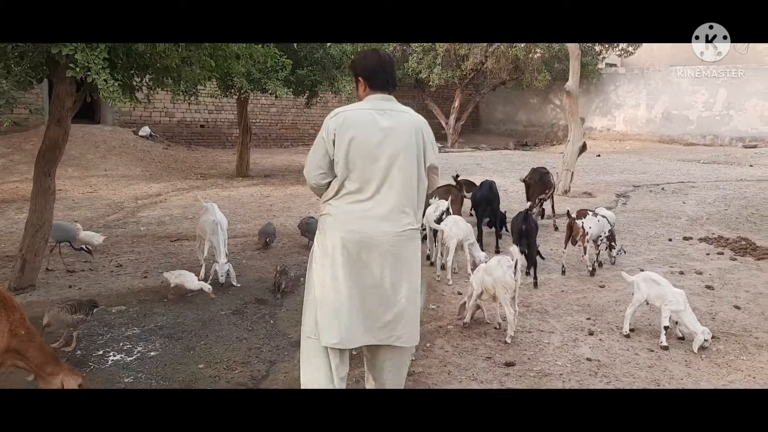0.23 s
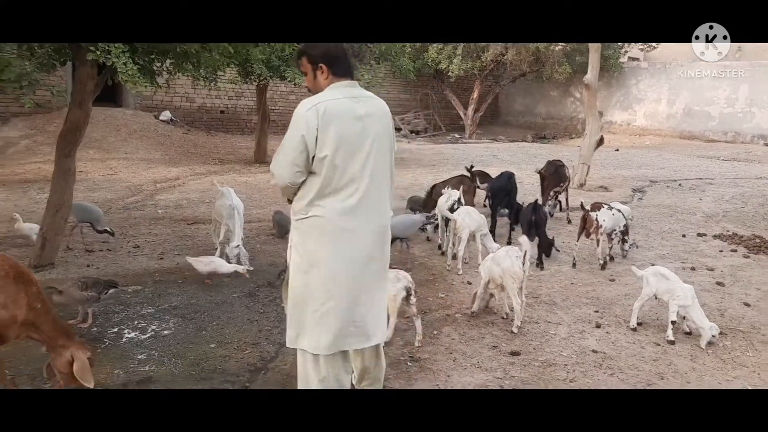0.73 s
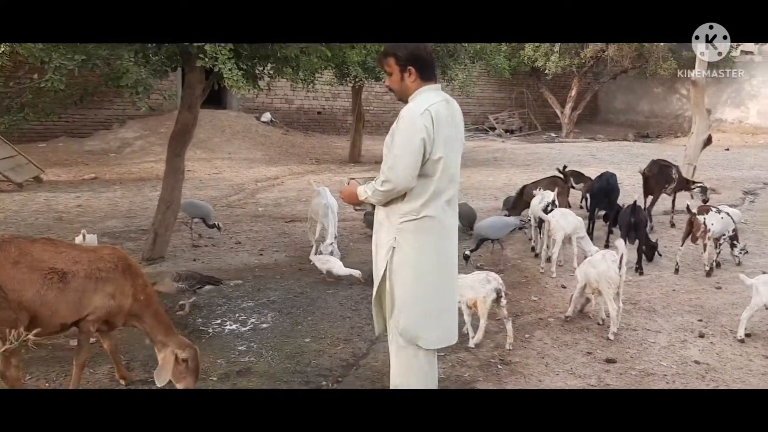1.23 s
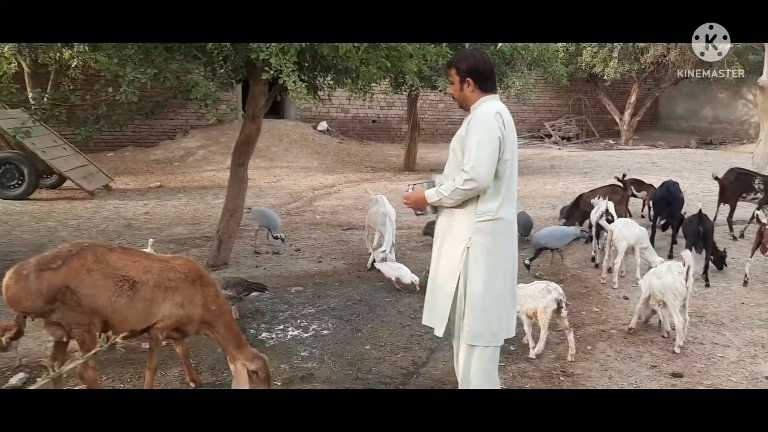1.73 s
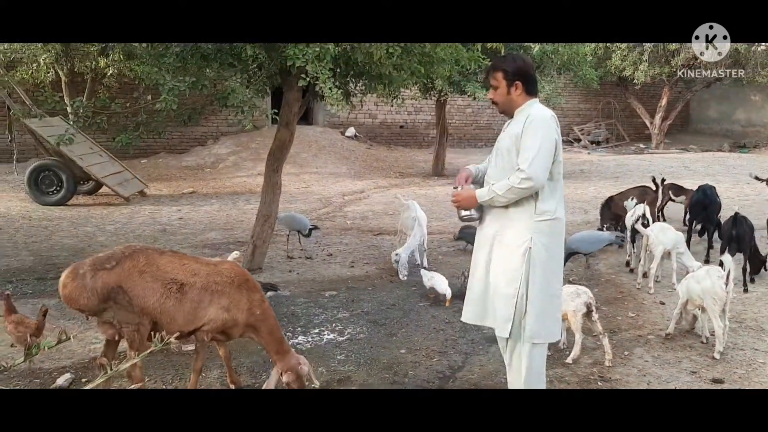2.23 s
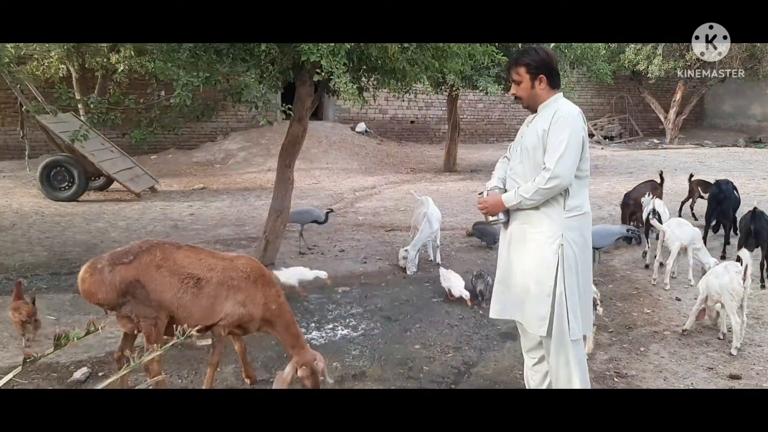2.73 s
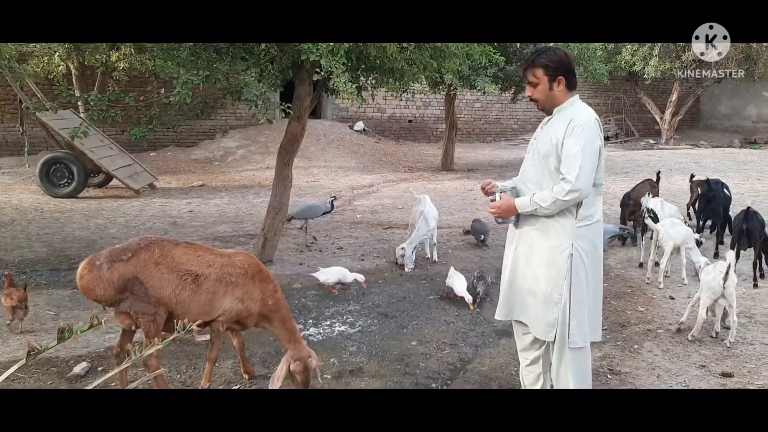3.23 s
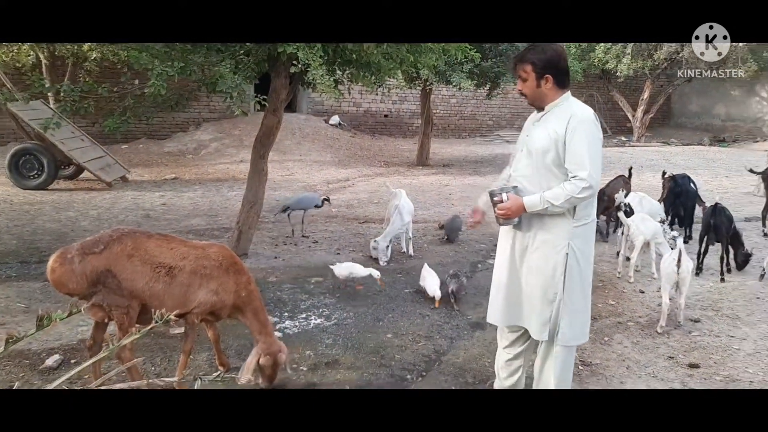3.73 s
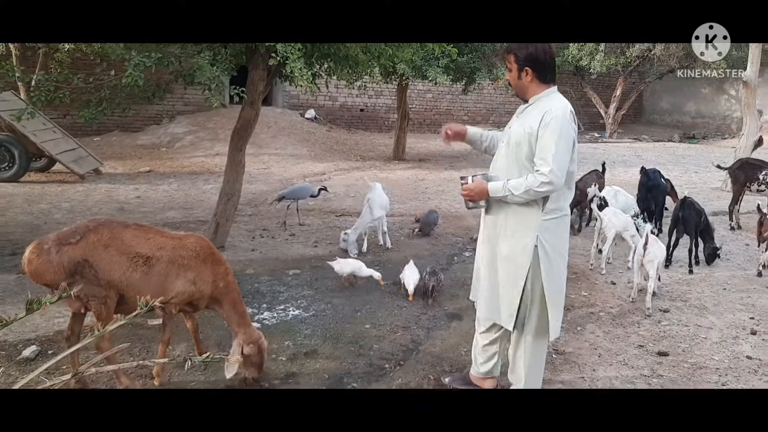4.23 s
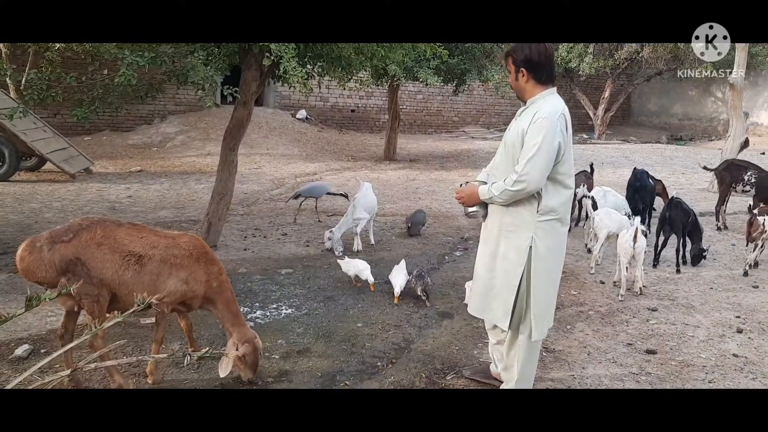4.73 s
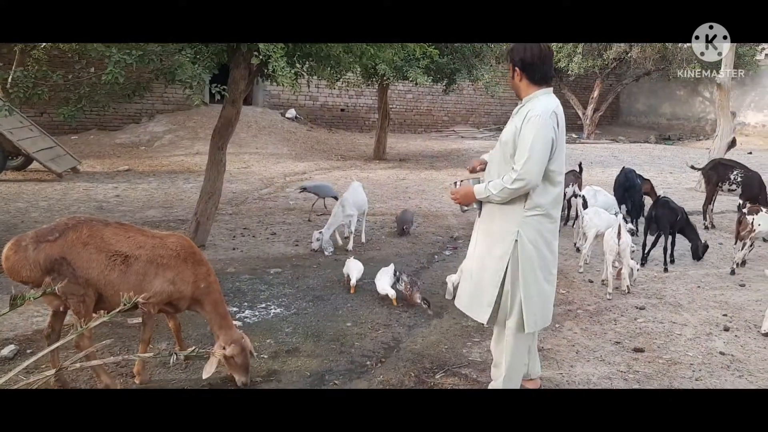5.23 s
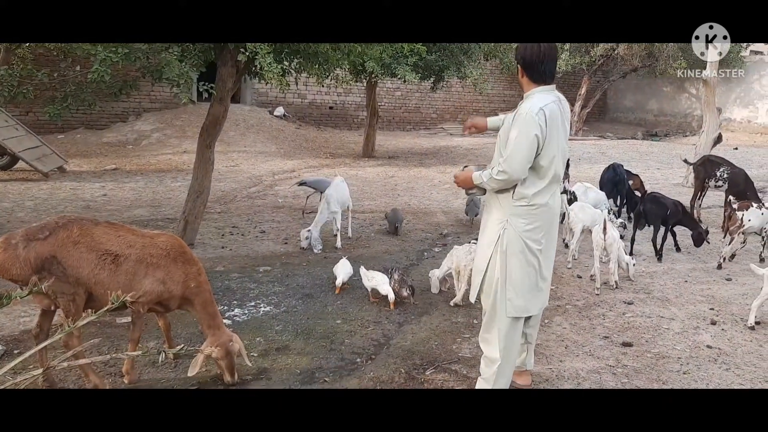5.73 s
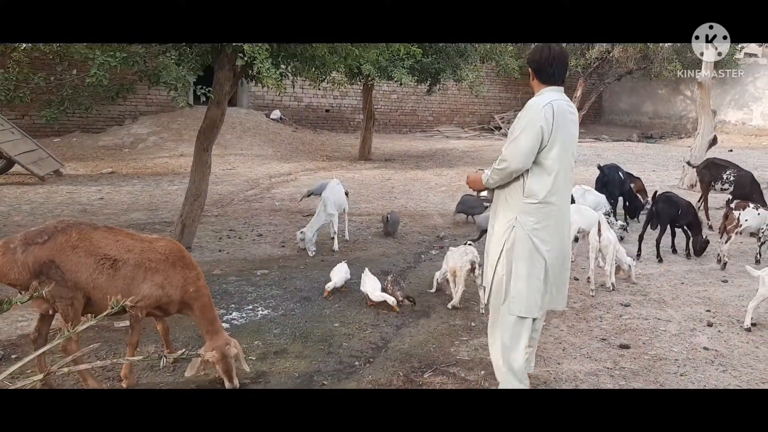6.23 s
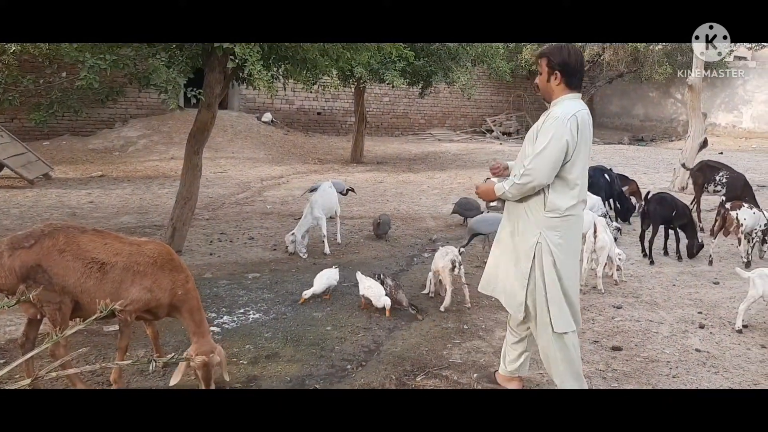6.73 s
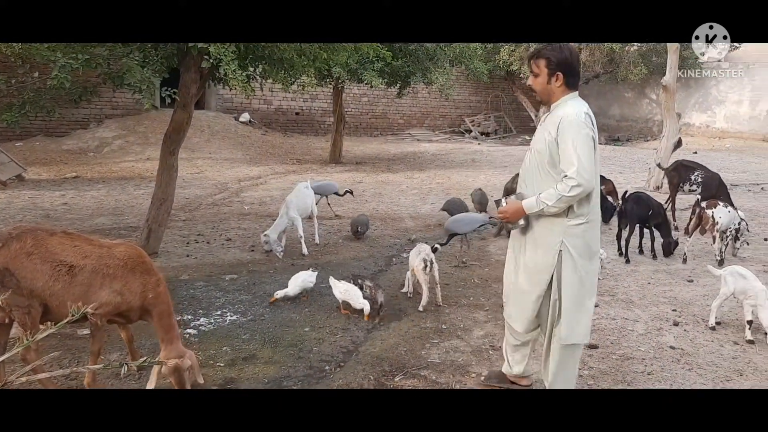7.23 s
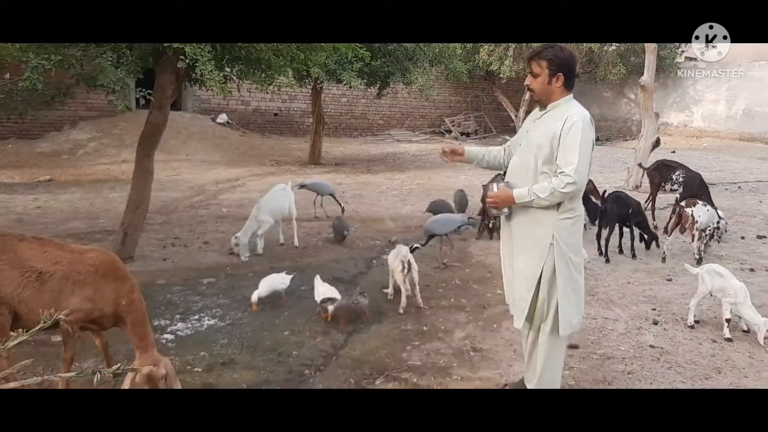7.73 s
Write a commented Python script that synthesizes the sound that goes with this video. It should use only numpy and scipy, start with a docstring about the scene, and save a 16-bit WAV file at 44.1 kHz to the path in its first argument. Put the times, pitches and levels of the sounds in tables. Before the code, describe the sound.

In an open walled farmyard, ducks give brief nasal quacks and squeaky peeps throughout. A hen clucks softly around three seconds, and a crow caws near four, five and six and a half seconds. Small birds whistle faintly. Dust scuffs, grain ticks and a few hollow trough knocks sit among them, over a faint flock murmur and low engine drone, caught by a phone with short wall echoes.

```python
"""Ducks quack and peep in a dusty walled farmyard heard by a phone; hens cluck, a crow caws three times, sparrows chirp.
Voices are source and filter: pulses or overtones excite beak and throat resonances; whistles are gliding sines.
Swells of hiss are mostly scuffed dust, one a caw's breathy end; grain patters as short bursts, a hollow trough rings.
Mud walls answer with short echoes and a scattered tail; a far flock murmurs in noise bands over a low engine drone."""
import sys
import numpy as np
from scipy import signal
from scipy.fft import rfft, irfft
from scipy.io import wavfile
from scipy.ndimage import uniform_filter1d

SR = 44100
rng = np.random.default_rng(int(sys.argv[2]) if len(sys.argv) > 2 else 0)


def bounce(signal):
    """Save signal as a 16-bit WAV file at the path given by the first command-line argument."""
    frames = np.transpose(np.atleast_2d(signal))
    limited = np.clip(frames, -1, 1)
    pcm = np.round(limited * 32767).astype(np.int16)
    wavfile.write(sys.argv[1], SR, pcm)


N = 351918
T = np.arange(N) / SR


def undb(db):
    """Level law: 20 dB is a factor of ten in amplitude."""
    return 10 ** (np.asarray(db) / 20)


def unit(x):
    """Normalisation to an RMS amplitude of 1."""
    return x / np.sqrt(np.mean(x ** 2))


def resonate(x, hz, width_hz):
    """Simple resonance: a band-pass with gain 1 at its centre."""
    return signal.lfilter(*signal.iirpeak(hz, hz / width_hz, SR), x)


def resonate_twice(x, hz, width_hz):
    """Cascaded resonance: two equal band-passes in series steepen the skirts."""
    return resonate(resonate(x, hz, width_hz), hz, width_hz)


def walk(rate_hz, size=N):
    """Slow random modulation: random levels, rate_hz a second, joined by slopes; spread near 1."""
    k = max(int(SR / rate_hz), 1)
    steps = np.repeat(rng.standard_normal(size // k + 1), k)
    return 1.2 * uniform_filter1d(steps, k)[:size]


def coloured(points):
    """Spectral shaping: white noise weighted by (Hz, dB) points, interpolated over log frequency."""
    hz, db = np.transpose(points)
    bins = np.arange(N // 2 + 1) * SR / N + 1  # the 1 Hz offset keeps the logarithm finite
    weights = undb(np.interp(np.log(bins), np.log(hz), db))
    return irfft(rfft(rng.standard_normal(N)) * weights, N)


def add(out, at, x):
    """Superposition: a sound is summed in from sample at, cut at the end of the scene."""
    out[at:at + len(x)] += x[:N - at]


def place(x, pan_db, lead_samples):
    """Two-port localisation by level and arrival time: the left port hears it lead_samples early."""
    left = np.roll(x, -int(round(lead_samples))) * undb(pan_db / 2)
    return np.array([left, x * undb(-pan_db / 2)])


def call(s, length, rise_s, end_db, edge_s=0.0033):
    """Call envelope: first sample, progress 0-1 and gain, drifting by the cube of progress to end_db."""
    t = T[:int(length * SR)]
    progress = t / length
    swell = np.clip(t / np.clip(rise_s, .002, length), 0, 1)
    edge = np.clip((length - t) / edge_s, 0, 1)
    return int(s * SR), progress, swell * edge * undb(end_db * progress ** 3)


# duck quacks: start t/s, length t/s, swell t/s, pitch f/Hz, sag (share of pitch), chest level/dB,
# throat level/dB over chest, bill level/dB over chest (throat and bill at mid-quack)
QUACKS = [(.272, 0.083, 0.023, 264.5, 0.093, -49.5, -1.5, -4),
          (0.488, 0.076, 0.013, 290.2, 0.028, -42.5, -3, -4.5),
          (.982, 0.052, 0.019, 309, .1, -52.5, -16, -18), (1.022, .076, 0.033, 224.5, 0.04, -45, -3, -5),
          (1.38, 0.098, 0.021, 215.8, -0.17, -43.5, -5.5, -12),
          (1.665, 0.09, 0.024, 220.2, -0.17, -44, -6, -14),
          (2.139, 0.073, 0.029, 301, .04, -51.5, -2.5, -15),
          (2.391, 0.086, 0.019, 211.8, -0.094, -46, -2, -5.5),
          (3.044, 0.03, .005, 197, -0.0091, -53.5, -2, -18),
          (3.083, 0.067, 0.0088, 204.8, 0.07, -44.5, -2.5, -4.5),
          (3.334, .08, 0.0088, 219.5, -0.16, -46, -1.5, 0.3),
          (3.924, 0.066, 0.016, 290.4, -0.128, -46.5, -5, -13),
          (5.105, .07, 0.011, 290.6, -.12, -43.5, -3, -15),
          (5.535, 0.056, 0.013, 290.3, 0.18, -44, -0.5, -8.5),
          (6.243, .03, .004, 219.4, -0.039, -52, -0.5, -16),
          (6.313, .042, 0.0069, 309.6, 0.245, -44, -2.5, -5.5),
          (7.7, .047, 0.011, 400, 0.41, -41.5, -6, -13.5)]
# resonances of chest, throat and bill: f/Hz, width f/Hz
QUACK_TRACT = [(350, 320), (1200, 480), (2330, 550)]


def ducks(end_db=-9.5, closing_db=-6, top_hz=2800):
    """Source-filter principle: uneven pulses and breath ring chest, throat and bill; the bill closes."""
    out = np.zeros(N)
    for s, length, swell_s, hz, sag, db, throat_db, bill_db in QUACKS:
        at, u, gain = call(s, length, swell_s, end_db, edge_s=0.013)
        n = len(u)
        pitch = hz * (1 - sag * u + .04 * walk(40, n) + .07 * walk(220, n))
        phase = 2 * np.pi * np.cumsum(pitch) / SR
        pulses = unit(sum(np.cos(k * phase) for k in range(1, 18)))
        pulses = pulses * undb(3 * walk(247.5, n))
        breath = .55 * (1 + np.cos(phase)) * rng.standard_normal(n)  # a puff with each pulse
        closing = closing_db * (u - .5)
        levels_db = (0, throat_db + closing, bill_db + closing)
        for (f, width), over_db in zip(QUACK_TRACT, levels_db):
            part = unit(resonate_twice(pulses + breath, f, width))
            add(out, at, part * undb(db + over_db + 2.83 * walk(60.5, n)) * gain)
    return signal.sosfilt(signal.butter(6, top_hz, fs=SR, output="sos"), out)


# short peeps: swell begins t/s, level/dB of the lowest partial, pitch f/Hz, swell t/s, fade t/s,
# level/dB step per overtone, beak lift level/dB, glide (share of pitch over swell and fade)
PEEPS = [(.257, -50, 916, 0.017, 0.014, -19, 0, 0), (.419, -38, 1556, 0.003, 0.023, -4.5, -4, -0.023),
         (.481, -33.5, 1065, 0.0077, 0.0094, -6.5, 0, -0.024),
         (1.023, -44, 963, 0.0056, 0.0094, -17, 0, -0.0034),
         (1.808, -41.5, 1125, 0.0077, 0.023, -4, 4.5, -0.24),
         (2.857, -45.5, 1310, 0.003, 0.0088, -16, 0, -0.14),
         (3.519, -38, 1576, 0.02, 0.003, -6, -1, -0.037),
         (3.617, -41.5, 1220, 0.012, 0.0094, -10.5, 0, -0.18),
         (4.621, -46, 1263, 0.0036, 0.013, -3.5, 0, 0.12),
         (4.797, -44, 1360, 0.0024, 0.0051, -17, 0, 0.0075),
         (5.305, -50.5, 1044, 0.0095, .015, -16, 0, -0.0054),
         (5.52, -40.5, 955, 0.011, 0.02, -16, 0, -0.01), (6.001, -43, 1340, 0.0014, 0.0027, -5, -1, -0.028),
         (6.169, -40, 1215, 0.0035, 0.0025, -1.5, -4, -0.094),
         (6.295, -31.5, 1096, 0.017, 0.0053, -12, 0, -0.04),
         (6.75, -39.5, 1160, 0.0013, 0.0026, -4.5, 0, -0.11),
         (7.028, -45.5, 1180, 0.0041, 0.0049, -18, -3, 0.087),
         (7.055, -42, 563, 0.0067, 0.011, -1, 9.5, 0.021),
         (7.676, -36, 1109, 0.017, 0.018, -12.5, 11, -0.068)]


def peeps(tremble=.012, low_hz=800, beak_hz=3600, beak_width_hz=1100):
    """Additive harmonics: a squeezed voice swells and dies; the beak alters partials near its resonance."""
    out = np.zeros(N)
    for s, db, hz, swell, fade, step_db, beak_db, glide in PEEPS:
        t = T[:int((swell + 2 * fade) * SR)]
        pitch = hz * (1 + glide * t / (swell + fade) + tremble * walk(357, len(t)))
        phase = 2 * np.pi * np.cumsum(pitch) / SR
        k = np.arange(int(np.ceil(low_hz / hz)), 9000 // hz + 1)[:, None]  # partials above low_hz
        beak = np.exp(-((k * hz - beak_hz) / beak_width_hz) ** 2)
        gain_db = step_db * (k - k[0]) + beak_db * beak
        stack = np.sum(undb(gain_db) * np.sin(k * phase + k * k), axis=0)  # k * k scatters the phases
        shape = np.where(t < swell, t / swell, np.exp(-(2 * (t - swell) / fade) ** 2))
        add(out, int(s * SR), undb(db) * stack * shape)
    return out


# hen clucks: start t/s, length t/s, highest mean pitch f/Hz, fundamental level/dB,
# open-beak level/dB over the fundamental at the start
CLUCKS = [(2.97, 0.061, 343, -56, 14), (3.636, 0.04, 347.4, -46.5, 10)]


def hens(jitter=.03, rise_s=.023, end_db=4, sag=.11, closing_db=-10.5):
    """Formant principle: a steadier fundamental plus overtones lifted by a beak that closes."""
    out = np.zeros(N)
    for s, length, hz, db, beak_db in CLUCKS:
        at, u, gain = call(s, length, rise_s, end_db)
        arc = 1 - sag * (2 * u - .7) ** 2
        phase = 2 * np.pi * np.cumsum(hz * (arc + jitter * walk(370, len(u)))) / SR
        overtones = sum(np.cos(k * phase) for k in range(2, 9))
        beak = unit(resonate_twice(overtones, 1110, 430))
        voice = np.sqrt(2) * np.cos(phase) + undb(beak_db + closing_db * u) * beak
        add(out, at, voice * undb(db) * gain)
    return out


# caws: start t/s, end t/s, swell t/s, scoop up to pitch f/Hz, 2nd harmonic level/dB before the throat,
# 3rd (at 490 Hz pitch) and 4th harmonic level/dB over the 2nd, mid-caw beak ring level/dB over the nominal 2nd
CAWS = [(3.909, 4.207, 0.038, 5, -40.5, -3, 0, -13.5), (4.869, 5.185, .07, 100, -41, -1, -1, -14),
        (6.396, 6.694, 0.068, 100, -41, .5, -4, -3.5)]
# other harmonics of the source: f/Hz, level/dB over the 2nd harmonic
CAW_UPPER = [(500, -17.5), (2500, -10.5), (3000, -48), (4200, -26), (4900, -12), (6000, -20.5),
             (7800, -13.5), (9000, -72)]
# pitch arc of every caw, before the scoop: t/s relative to its end, f/Hz
CAW_ARC = [(-.32, 476), (-.22, 489), (-.17, 495), (-.13, 488), (-.08, 458), (-.035, 435), (0, 373)]
# throat resonances: f/Hz, width f/Hz
CAW_THROAT = [(1070, 145), (1400, 500), (1830, 290)]


def crow(swing_rad=0.52, throb=0.16, skew_rad=0.59, rasp=0.18, air_db=-24, calm_hz=400, ring_hz=3550,
         flutter_hz=73, scoop_s=.07, fade_s=.048, edge_db=-18.5, third_db_per_hz=.071, ring_swell_db=6):
    """Joint FM and AM: a second membrane flutters pitch and strength, giving every harmonic sidebands."""
    out = np.zeros(N)
    upper_hz, upper_db = np.transpose(CAW_UPPER)
    for s, end, swell_s, scoop_hz, db, third_db, fourth_db, ring_db in CAWS:
        at, u, gain = call(s, end - s, 0.0042, 0)
        n = len(u)
        t = T[at:at + n]
        scoop = scoop_hz * np.clip(1 - (t - s) / scoop_s, 0, 1)
        hz = np.interp(t - end, *np.transpose(CAW_ARC)) - scoop
        edge = np.maximum(1 - (t - s) / swell_s, 1 - (end - t) / fade_s)
        level_db = db + edge_db * np.clip(edge, 0, 1)
        third_db = third_db + third_db_per_hz * (490 - hz)  # gains as the pitch sinks

        hz = uniform_filter1d(hz, SR // 50) * (1 + .003 * walk(150, n))
        depth = np.clip((hz - calm_hz) / (490 - calm_hz), .35, 1)  # flutter calms as the pitch sinks
        flutter = 2 * np.pi * flutter_hz * t
        bent = 2 * np.pi * np.cumsum(hz) / SR + swing_rad * depth * np.sin(flutter)

        own_db = {2: 0, 3: third_db, 4: fourth_db}
        source = 0
        for k in range(1, 19):
            harmonic_db = own_db[k] if k in own_db else np.interp(k * hz, upper_hz, upper_db)
            source = source + undb(harmonic_db) * np.cos(k * bent + k * k)
        voice = 0.44 * source + sum(resonate(source, f, width) for f, width in CAW_THROAT)

        air = unit(resonate(rng.standard_normal(n), 5400, 5500))
        beak_drive = sum(np.cos(k * bent) for k in range(6, 11)) + 0.9 * air
        ring = unit(resonate_twice(beak_drive, ring_hz, 500))
        ring = ring * undb(ring_db + ring_swell_db * (u - .5) + 3.9 * walk(42, n))
        rough = 1 + rasp / depth * walk(500, n)
        voice = (voice + ring) * rough + undb(air_db) * air
        throbbing = 1 + throb * depth * np.cos(flutter + skew_rad)
        add(out, at, 1.195 * voice * throbbing * undb(level_db) * gain)
    return out


# whistles of small birds: start t/s, length t/s, swell t/s, from f/Hz, to f/Hz,
# arch above the straight glide at its middle f/Hz, level/dB
WHISTLES = [(.6, .05, .02, 4100, 4500, 5, -61), (.645, .15, 0.018, 4850, 5200, 148, -54),
            (3.83, 0.055, 0.009, 5100, 5980, 200, -62), (3.9, .075, 0.054, 4250, 5150, 52, -49),
            (4.385, 0.068, .01, 6280, 6000, 29, -59.5), (4.595, 0.069, 0.024, 6300, 6900, 150, -60),
            (6.045, .085, 0.0061, 1180, 950, 401, -55), (7.94, 0.041, 0.029, 1240, 1340, -28, -49),
            (2.53, 0.079, 0.028, 2380, 2400, 6, -69), (1.4, 0.065, .01, 4100, 3200, 5, -63)]


def whistles(wobble=.02, end_db=-6):
    """Frequency modulation: near sines glide in an arch between pitches, trembling and breaking up."""
    out = np.zeros(N)
    for s, length, swell_s, from_hz, to_hz, arch_hz, db in WHISTLES:
        at, u, gain = call(s, length, swell_s, end_db)
        hz = from_hz + (to_hz - from_hz) * u + 4 * arch_hz * u * (1 - u)
        phase = 2 * np.pi * np.cumsum(hz * (1 + wobble * walk(300, len(u)))) / SR
        level = undb(db + 4.5 * walk(90, len(u)))
        add(out, at, np.sqrt(2) * np.sin(phase) * level * gain)
    return out


# hoarse chatter of a small bird: start t/s, length t/s, level/dB
CHATTER = [(0.541, 0.032, -53.5), (3.524, 0.098, -50)]


def chatter(hz=3200, width_hz=600, end_db=-29):
    """Filtered turbulence: breath through a narrow beak, chopped unevenly."""
    out = np.zeros(N)
    for s, length, db in CHATTER:
        at, u, gain = call(s, length, .008, end_db)
        air = resonate_twice(rng.standard_normal(len(u)), hz, width_hz)
        chopped = unit(air * undb(11.6 * walk(98, len(u))))
        add(out, at, chopped * undb(db) * gain)
    return out


# hollow knocks: t/s, level/dB before the mode gains, 60 dB decay of the lowest mode t/s
KNOCKS = [(1.314, -47.5, 0.073), (1.353, -40.5, 0.071), (1.785, -50, .05), (1.885, -49, 0.048),
          (2.376, -37, 0.042), (5.673, -50.5, 0.094), (5.784, -46.5, 0.12), (6.105, -35.5, 0.049)]
# modes of the hollow trough: f/Hz, level/dB
HOLLOW = [(335, 8.5), (520, -2), (1300, -1.5)]


def knocks():
    """Modal decay: a soft blow rings a hollow trough, its higher modes dying sooner."""
    out, t = np.zeros(N), T[:SR // 5]
    lowest_hz = HOLLOW[0][0]
    for s, db, t60 in KNOCKS:
        ring = 0
        for f, mode_db in HOLLOW:
            decay_db = -60 * t * f / lowest_hz / np.clip(t60, .02, .12)
            ring = ring + undb(mode_db + decay_db) * np.sin(2 * np.pi * f * t)
        add(out, int(s * SR), undb(db) * ring * np.minimum(t / 0.0025, 1))
    return out


# grain and pebbles landing: t/s, peak level/dB before panning, centre f/Hz, left minus right level/dB
TICKS = [(0.616, -45, 4640, 6), (0.796, -44, 5150, 1.1), (0.8894, -40, 6840, 4), (1.1347, -47, 1170, 9),
         (1.3533, -44, 6400, 0.6), (1.7005, -43, 1140, 6), (2.7018, -49, 3950, 5), (3.2226, -47, 4490, 0.6),
         (4.6225, -40, 1280, 0.6), (5.357, -44, 2000, 7), (5.853, -47.5, 1400, 7), (5.4525, -50, 2980, 2.1),
         (5.5757, -39, 1250, 10), (6.054, -40.5, 1290, 12), (6.138, -40, 1300, 9), (6.1976, -40.5, 2080, 7),
         (6.396, -42, 1140, 1.1), (6.9, -46.5, 1300, 1.1), (7.215, -50, 3430, -1), (7.3413, -44, 2670, -7),
         (7.3738, -44, 3170, 0.6), (7.813, -48.5, 1300, 7), (7.8962, -47.5, 1170, 9)]


def ticks():
    """Impulsive excitation: dry clicks, each a short noise burst ringing round a centre."""
    out, t = np.zeros((2, N)), T[:SR // 30]
    for s, db, hz, pan_db in TICKS:
        burst = rng.standard_normal(len(t)) * undb(-60 * t / .012)
        click = resonate_twice(burst, hz, .6 * hz)
        click = click / np.abs(click).max()
        for side, sign in zip(out, (1, -1)):
            add(side, int(s * SR), click * undb(db + sign * pan_db / 2))
    return out


# hiss swells, mostly dust scuffed underfoot, and at 4.16 s the breathy end of a caw:
# loudest at t/s, level/dB, rise t/s, fall t/s (both over 20 dB)
HISS_SWELLS = [(.22, -65.5, 0.2, 0.64), (.44, -55, 0.034, 0.058), (.51, -59.5, 0.085, 0.66),
               (.8, -55.5, .08, 0.23), (1.07, -58, 0.34, 0.18), (1.4, -58, 0.13, 0.19),
               (1.73, -62, 0.11, 0.4), (2.45, -47.5, 0.08, 0.085), (2.64, -57.5, .07, 0.2),
               (2.87, -55.5, 0.42, 0.12), (3.0, -54, 0.1, 0.47), (3.38, -52, 0.11, 0.14),
               (3.56, -58.5, 0.094, 0.13), (4.16, -54, 0.38, 0.091), (4.27, -62.5, 0.13, 0.73),
               (4.62, -59.5, 0.022, 1.5), (4.98, -44, 0.15, 0.15), (5.16, -52.5, 0.25, 0.27),
               (5.33, -54.5, 0.046, 0.32), (5.55, -57.5, 0.26, 0.19), (5.93, -65.5, 0.35, 1.6),
               (6.18, -58, 0.16, 0.13), (6.6, -46, .35, 0.23), (6.8, -51.5, 0.11, .29),
               (7.02, -55, 0.046, 0.67), (7.4, -61.5, .5, 0.17), (7.6, -64, 0.14, 0.17)]
# relative spectrum of the hiss: f/Hz, level/dB per Hz
HISS_COLOUR = [(410, -24), (700, -11), (738, -1), (1750, -1), (1890, 0.5), (2400, 1), (9730, -6),
               (14000, -3.5), (16000, -9.5)]


def hiss(grains_per_s=60, grain_db=4, grit=0.65, like=0.22, bed_db=-76.5, grain_fade_s=.025):
    """Noise swells summed by power, mostly scuffed dust; unequal grains roughen them in jumps and fades."""
    power = undb(bed_db) ** 2  # the herd never quite stands still
    for s, db, rise, fall in HISS_SWELLS:
        drop_db = 20 * np.where(T < s, (s - T) / rise, (T - s) / fall)
        power = power + undb(db - drop_db) ** 2
    grains = (rng.random(N) < grains_per_s / SR) * undb(grain_db * rng.exponential(size=N))
    crumbling = unit(signal.lfilter([1], [1, -np.exp(-1 / (grain_fade_s * SR))], grains))
    shared = coloured(HISS_COLOUR)
    sides = np.array([like * shared + coloured(HISS_COLOUR) for _ in range(2)])
    return unit(sides) * (1 + grit * crumbling) * np.sqrt(power)


def patter(per_s=60, db=-72, spread_db=1.0, hz=1500):
    """Random point process: bills peck and grain lands all over the yard as faint dull taps."""
    taps = (rng.random((2, N)) < per_s / SR) * undb(spread_db * rng.exponential(size=(2, N)))
    bursts = signal.lfilter([1], [1, -.985], taps) * rng.standard_normal((2, N))
    left, right = resonate_twice(bursts, hz, 1900)
    return unit(np.array([left + 0.22 * right, right + 0.24 * left])) * undb(db)


def crackle(per_s=25, db=-81, spread_db=4, low_hz=6000):
    """Sparse random impulses, high-passed: dry grit snaps under hooves as faint bright ticks."""
    sizes = undb(spread_db * np.minimum(rng.exponential(size=N), 3))
    taps = (rng.random(N) < per_s / SR) * sizes
    snaps = signal.lfilter([1], [1, -.985], taps) * rng.standard_normal((2, N))
    return unit(signal.lfilter(*signal.butter(2, low_hz, "high", fs=SR), snaps)) * undb(db)


# slaps off the walls, before the bass loss: t/s, level/dB
ECHOES = [(0.023, -11), (0.077, -13)]


def walls(x, tail_db=-4.5, t60_s=.32, low_hz=1500):
    """Reflection and diffusion: wall slaps and a scattered tail on each side; the open sky swallows bass."""
    t = T[:SR // 2]
    out = []
    for side in range(2):
        tail = resonate(rng.standard_normal(len(t)), 1230, 6700)
        tail = tail * undb(-60 * t / t60_s) * np.minimum(t / 0.0049, 1)
        tail = tail / np.sqrt(np.sum(tail ** 2)) * undb(tail_db)
        for s, db in ECHOES:
            tail[int((s + .0007 * side) * SR)] += undb(db)  # the right side hears it 0.7 ms later
        thin = signal.lfilter(*signal.butter(2, low_hz, "high", fs=SR), tail)
        out.append(signal.fftconvolve(x, .45 * tail + .55 * thin)[:N])
    return np.array(out)


# noise spectrum before the band split: f/Hz, relative level/dB per Hz
YARD = [(88, -26), (150, -1), (226, -10.5), (315, 5), (759, -11), (1290, -11.5), (6260, -24), (9440, -26),
        (12700, -34), (16000, -51)]
# swelling of the far flock: t/s, level/dB (only the departure from the mean counts)
MURMUR = [(0, -75.5), (.31, -71.5), (.5, -59), (.8, -68), (1.69, -63), (2.02, -71.5), (3.15, -63.5),
          (4.18, -67), (4.45, -72), (5.8, -63), (6.4, -61), (7.3, -74.5), (7.98, -62.5)]


def yard(db=-63, swell_db=2.5):
    """Band noise and coherence: a far flock murmurs in octaves; bass alike on both sides, treble not."""
    out = 0
    murmur_db = np.interp(T, *np.transpose(MURMUR))
    murmur_db = murmur_db - murmur_db.mean()
    for hz in 180 * 2. ** np.arange(7):
        mid, side = (resonate_twice(coloured(YARD), hz, hz) for _ in range(2))
        band = mid + min(hz / 1500, 1) * side * np.array([[1], [-1]])
        out = out + band * undb(swell_db * walk(4.8) + murmur_db * min(700 / hz, 1))
    return unit(out) * undb(db)


# far engine drone: t/s, level/dB before the sides are blended
RUMBLE = [(0, -63), (2.15, -65), (3.2, -63), (4.6, -60), (5.3, -62.5), (6.5, -61), (7.05, -58), (7.6, -67),
          (8, -57)]


def engine():
    """Narrow-band noise: a far engine drones low, its two sides blended from two independent noises."""
    first, second = (unit(resonate(resonate(rng.standard_normal(N), 106, 88), 59, 94)) for _ in range(2))
    drone = np.array([first + 0.36 * second, first - 0.26 * second])
    return drone * undb(np.interp(T, *np.transpose(RUMBLE)))


def scene(caw_echo_db=-3):
    """Superposition of direct sound, wall reflections and background."""
    caws = crow()
    # (sound, left minus right dB, samples the left side leads)
    sources = [(ducks(), 1.5, 2.4), (peeps(), 1.2, 4.1), (hens(), 1.2, 3.4), (caws, .6, 6.1),
               (whistles(), .3, 3.1), (chatter(), -.8, 3.2), (knocks(), .8, 1.4)]
    direct = sum(place(*source) for source in sources)
    # the crow sits high, clear of the walls, so it echoes less
    to_walls = sum(source[0] for source in sources) - (1 - undb(caw_echo_db)) * caws
    unechoed = ticks() + hiss() + patter() + crackle()
    return direct + walls(to_walls) + unechoed + yard() + engine()


def record(dry):
    """Band limiting: the phone cuts the top steeply above 15750 Hz."""
    return signal.sosfilt(signal.ellip(10, .2, 70, 15750, fs=SR, output="sos"), dry)


dry = scene()
out = record(dry)
bounce(out)
```